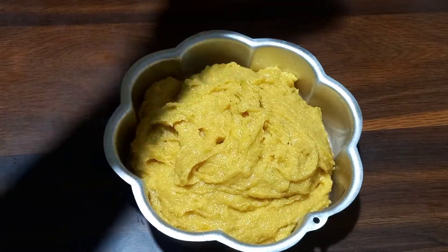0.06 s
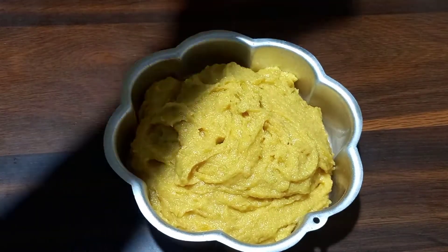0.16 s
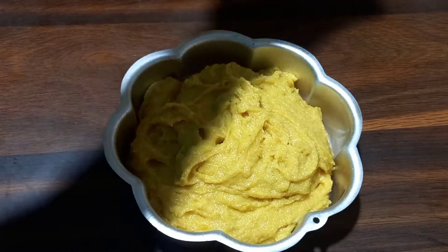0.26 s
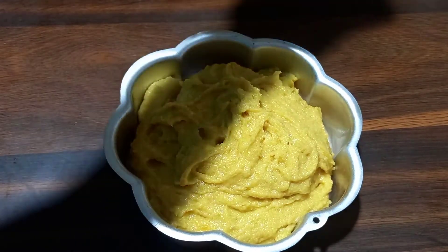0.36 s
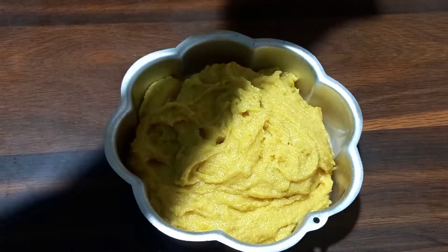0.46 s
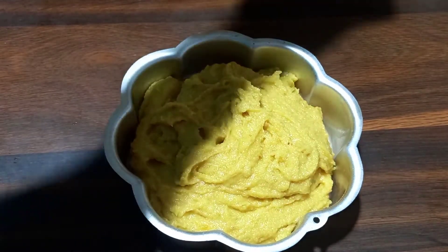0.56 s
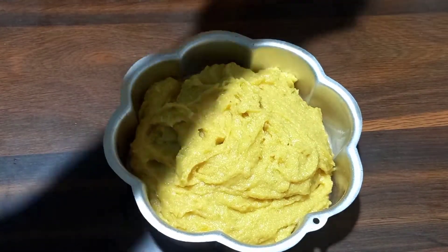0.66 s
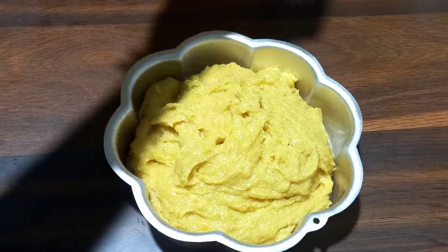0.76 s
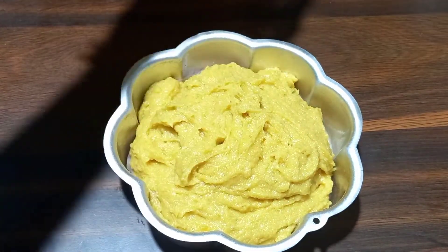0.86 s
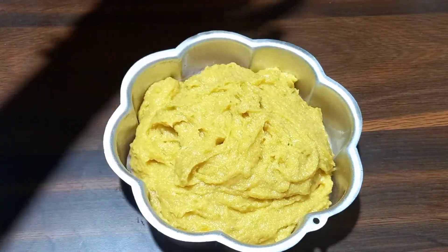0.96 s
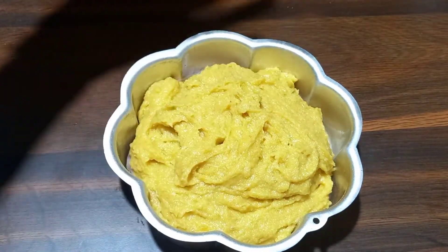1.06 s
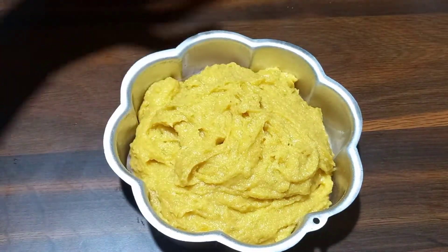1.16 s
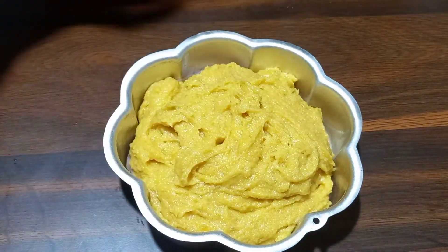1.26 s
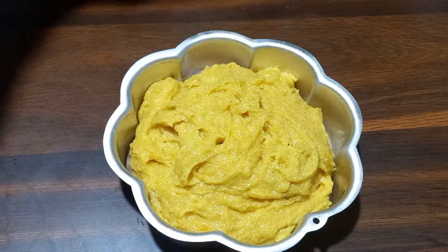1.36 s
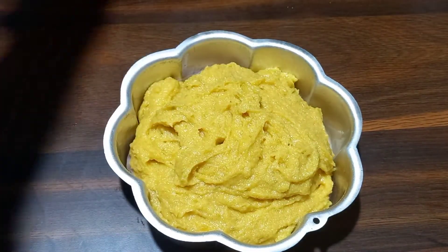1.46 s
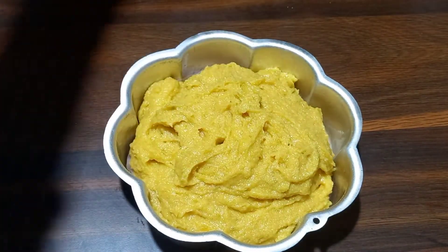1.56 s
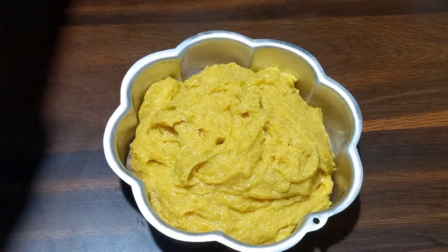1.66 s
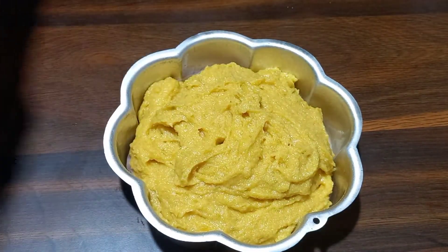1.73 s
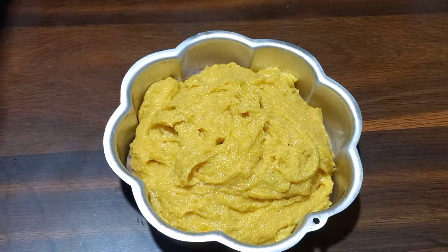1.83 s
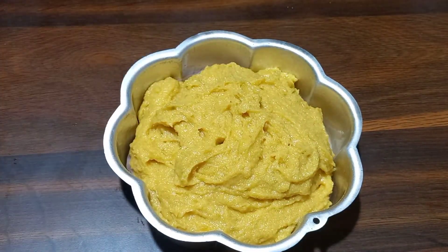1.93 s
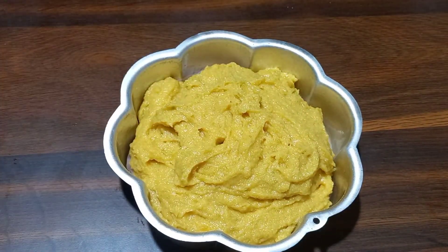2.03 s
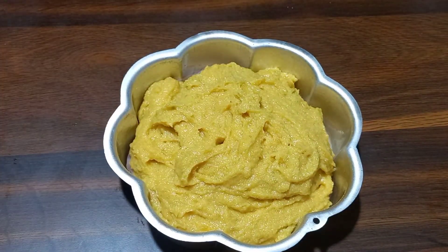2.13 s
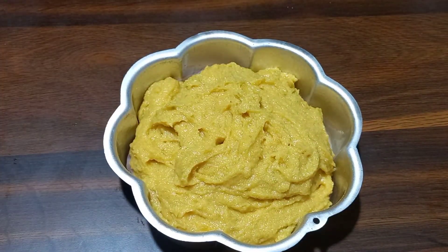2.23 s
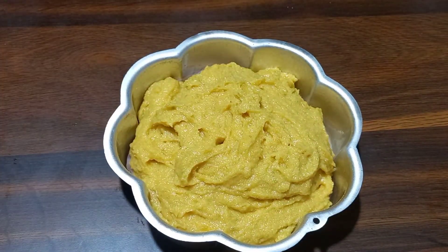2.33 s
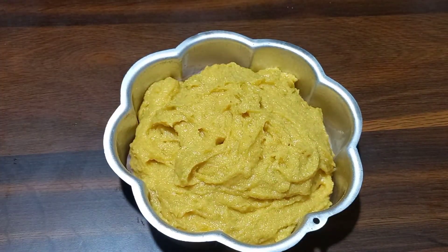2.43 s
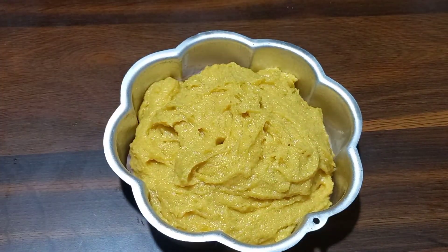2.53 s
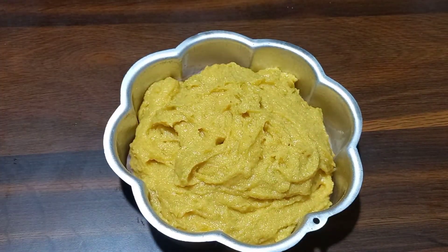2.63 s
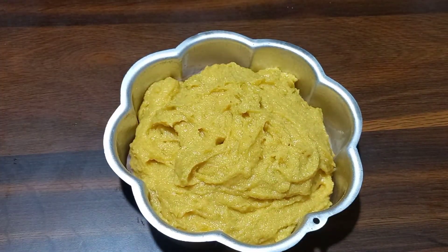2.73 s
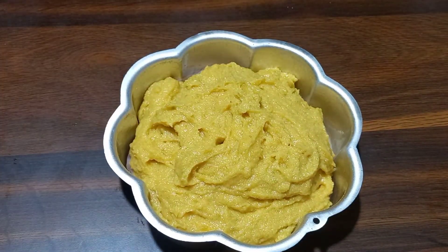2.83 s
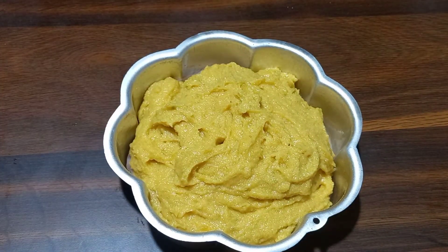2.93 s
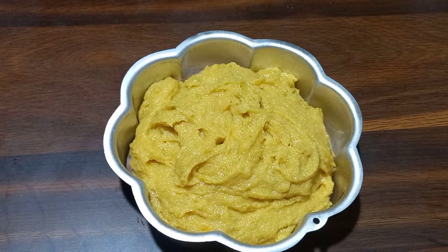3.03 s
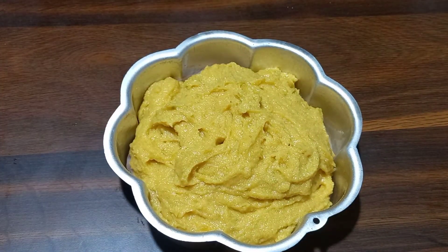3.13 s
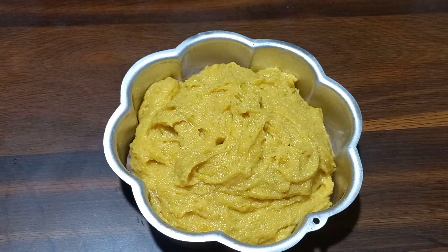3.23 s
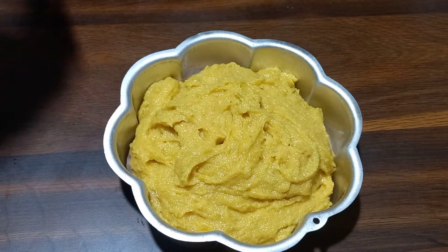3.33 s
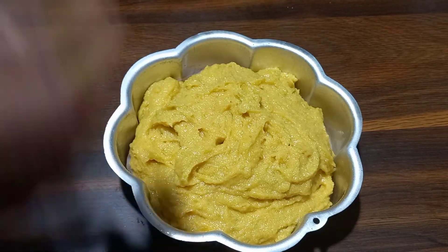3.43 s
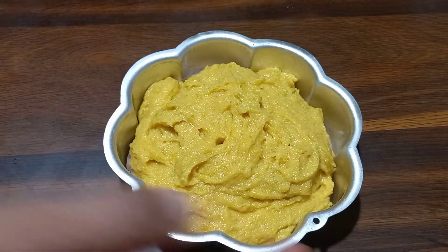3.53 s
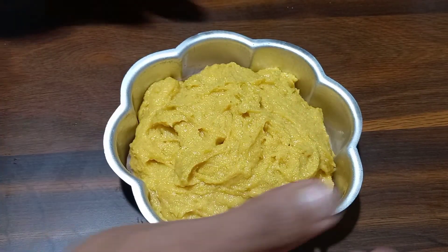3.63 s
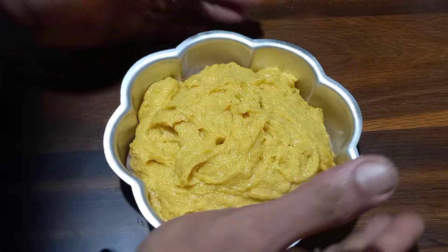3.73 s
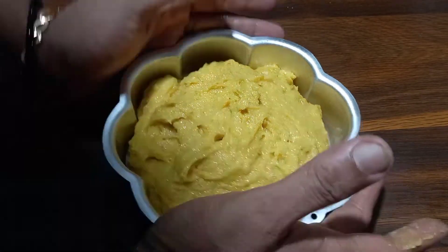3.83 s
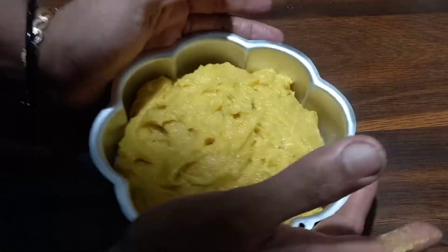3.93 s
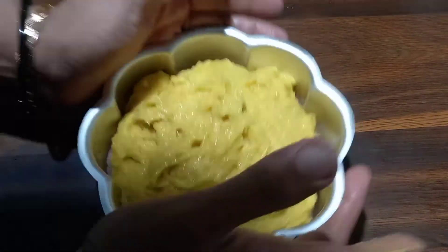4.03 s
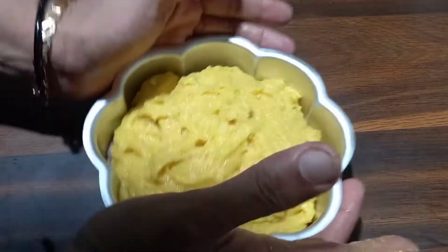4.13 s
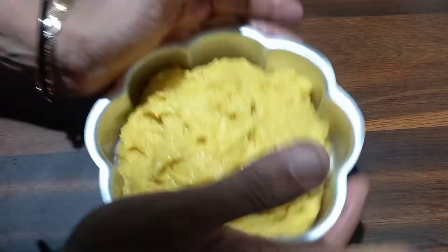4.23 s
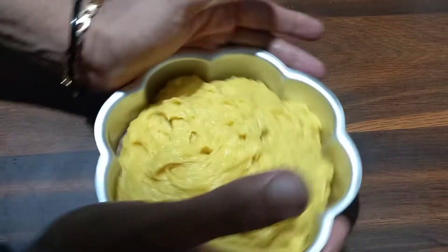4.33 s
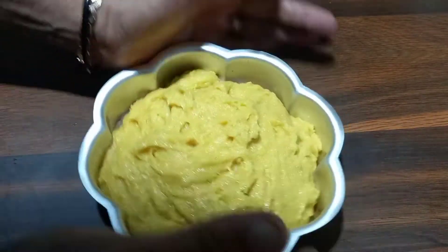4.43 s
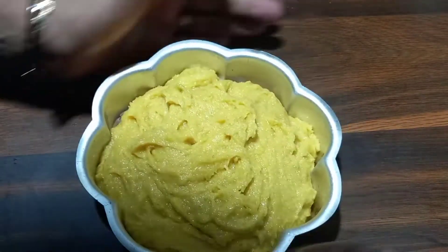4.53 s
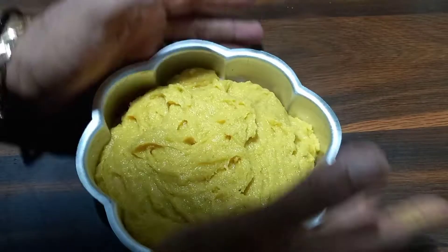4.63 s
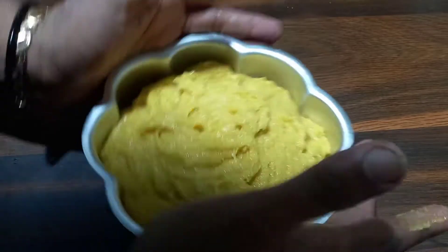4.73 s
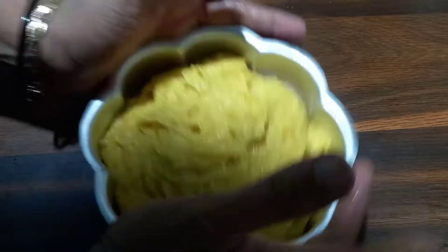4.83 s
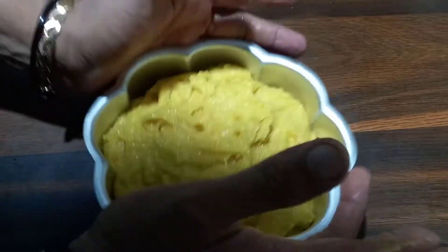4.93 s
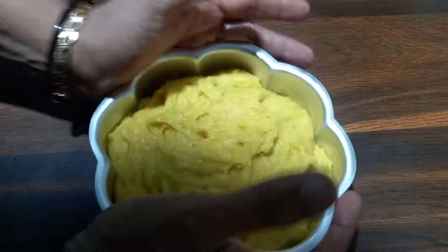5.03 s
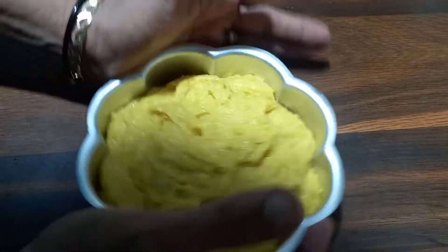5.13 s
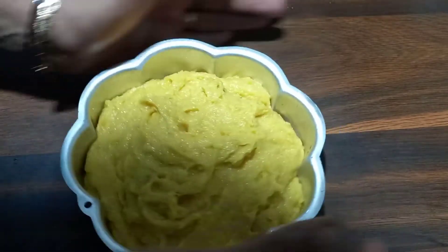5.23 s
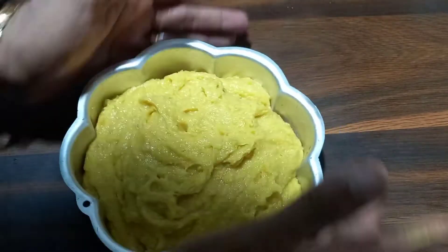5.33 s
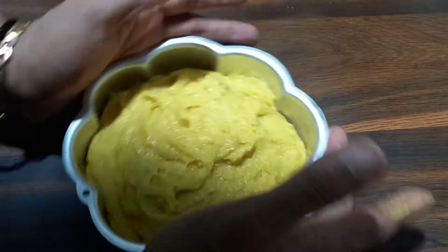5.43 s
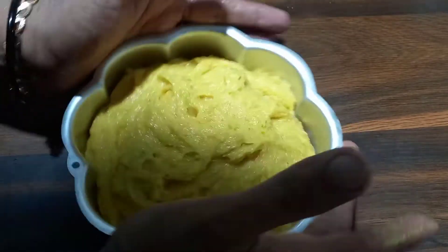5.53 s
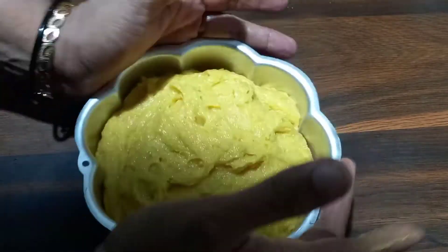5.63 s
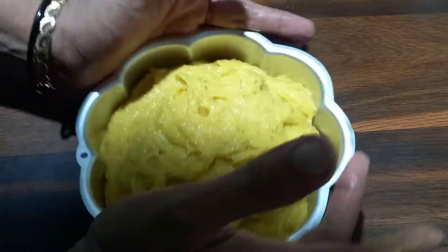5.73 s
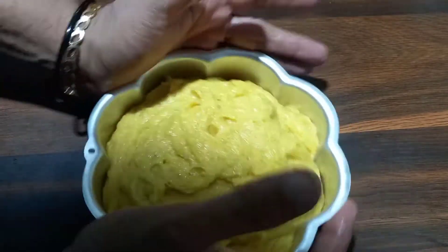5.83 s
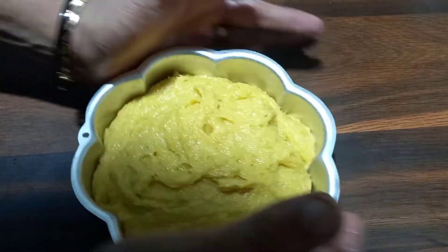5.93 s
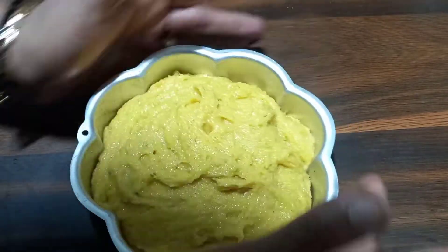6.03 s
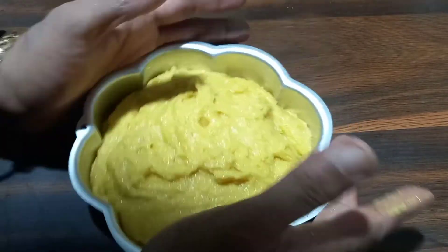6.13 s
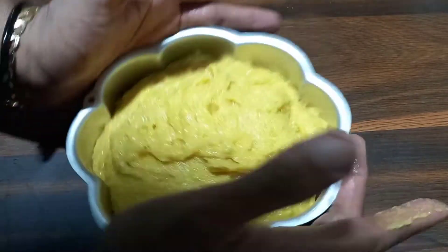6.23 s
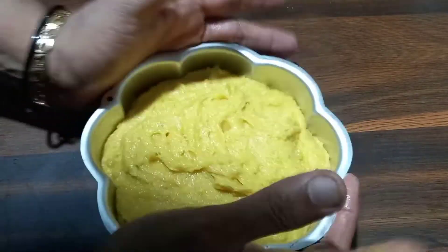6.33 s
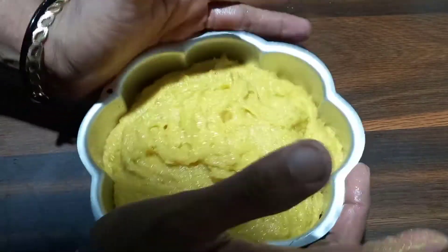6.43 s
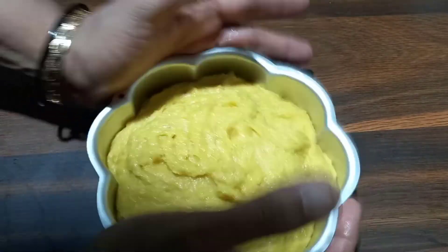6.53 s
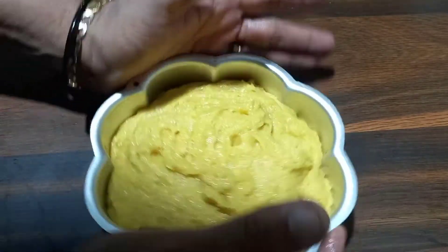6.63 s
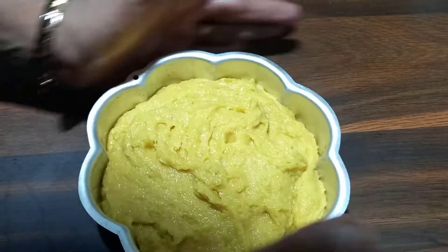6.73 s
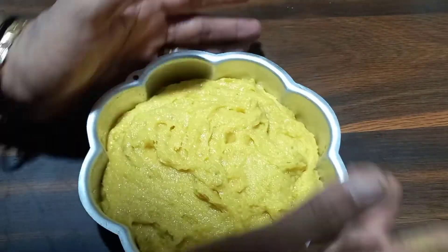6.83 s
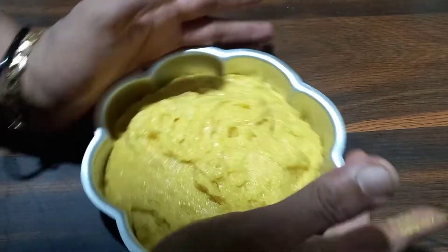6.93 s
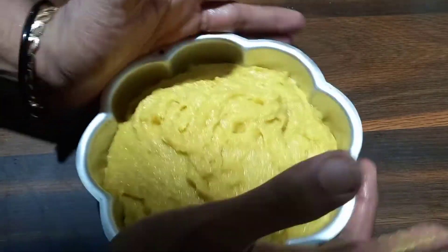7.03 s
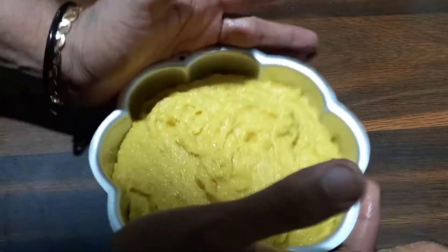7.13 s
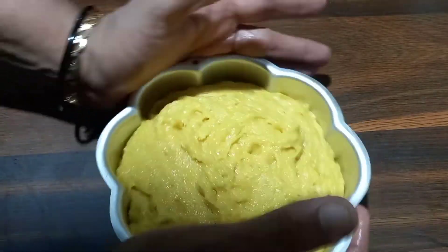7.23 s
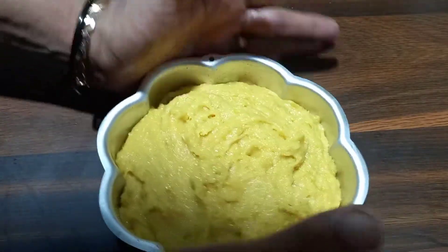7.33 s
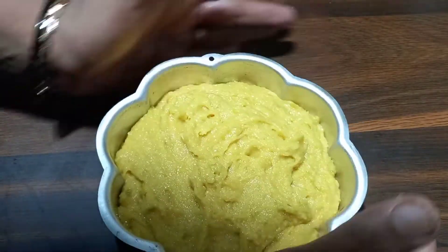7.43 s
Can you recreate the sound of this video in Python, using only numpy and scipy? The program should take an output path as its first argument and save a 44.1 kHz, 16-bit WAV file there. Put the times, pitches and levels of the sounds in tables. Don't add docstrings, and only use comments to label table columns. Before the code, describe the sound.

Soft wooden-sounding bowl knocks, rubbing and thin metallic scrapes open the scene, fading into a quiet room with light rustles. Thin bangles begin to tinkle as hands reach in. Five loud, flat double bangs of a batter-deadened metal tin on a counter follow at roughly regular intervals, bangles clinking after each impact and during lifting. Close stereo microphones catch a short, lively kitchen reverberation.

```python
import sys
import numpy as np
from scipy import signal
from scipy.fft import rfft, irfft, next_fast_len
from scipy.io import wavfile
from scipy.ndimage import uniform_filter1d

SR = 44100
rng = np.random.default_rng(int(sys.argv[2]) if len(sys.argv) > 2 else 0)


def elevation(decibels):
    levels = np.asarray(decibels, float)
    return 10 ** (levels / 20)


def log_audio(samples):
    frames = np.atleast_2d(samples).T
    limited = np.clip(frames, -1, 1)
    pcm = np.round(limited * 32767).astype(np.int16)
    wavfile.write(sys.argv[1], SR, pcm)


N = 329868

# (frequency [Hz], level [dB], T60 [s])
BOWL_MODES = [(79.5, -13.5, 0.27), (181, -12, 0.14), (218, -7.5, 0.11), (298.5, -8.5, 0.06),
              (365, -1, 0.11), (406.5, 1, 0.1), (473.2, -1.5, 0.12), (546, 0, 0.055), (613, -14, 0.0085)]
# (frequency [Hz], T60 [s])
KITCHEN_T60 = [(60, 0.29), (160, 0.48), (420, 0.55), (1100, 0.58), (2900, 0.56), (7700, 0.49),
               (16000, 0.32)]
# (frequency [Hz], level [dB per Hz])
SLAP_SPECTRUM = [(150, -30.5), (518, -10), (1010, -15), (1970, -9.5), (3100, -1), (6810, -7), (8450, -22.5),
                 (12300, -19.5), (16500, -26)]
TAIL_DB = -23
RISE_SHARE = 0.44


def rms_one(x):
    return x / np.sqrt(np.mean(x ** 2) + 1e-20)


def at_hz(points, hz):
    points = np.array(points)
    return np.interp(np.log(np.maximum(hz, 1)), np.log(points[:, 0]), points[:, 1])


def colour(x, spectrum):
    size = 4096
    cepstrum = irfft(np.log(elevation(at_hz(spectrum, np.fft.rfftfreq(size, 1 / SR)))))
    cepstrum[1:size // 2] *= 2
    cepstrum[size // 2 + 1:] = 0
    response = irfft(np.exp(rfft(cepstrum)))
    response = response.reshape((1,) * (x.ndim - 1) + (-1,))
    return signal.oaconvolve(x, response, axes=-1)[..., :x.shape[-1]]


def ring(clicks, hz, t60):
    radius = elevation(-60 / (max(t60, .003) * SR))
    angle = 2 * np.pi * hz / SR
    return signal.lfilter([0, np.sin(angle)], [1, -2 * radius * np.cos(angle), radius ** 2], clicks + 1e-18)


def strike(seconds, db, modes, spread_db):
    at = np.round(np.asarray(seconds) * SR).astype(int)
    out = np.zeros(N)
    chance = rng.standard_normal((len(at), len(modes), 2))
    for k, (hz, level_db, t60) in enumerate(modes):
        clicks = np.zeros(N)
        clicks[at] = elevation(db + level_db + spread_db * chance[:, k, 0]) * np.sign(chance[:, k, 1])
        out += ring(clicks, hz, t60)
    return out


def soften(x, hz):
    return signal.sosfilt(signal.butter(2, hz, fs=SR, output="sos"), x)


def unboom(x, hz):
    return signal.sosfilt(signal.butter(2, hz, "high", fs=SR, output="sos"), x)


def apart(x, lag):
    return np.stack([x, np.roll(x, lag)])


def chatter(seconds, db, length_s, per_s):
    starts = np.zeros(N)
    starts[np.round(seconds * SR).astype(int)] = elevation(db)
    dying = signal.lfilter([1], [1, -np.exp(-1 / (length_s * SR))], starts + 1e-18)
    shared, *own = rng.standard_normal((3, N)) * (rng.random((3, N)) < per_s / SR)
    return dying * (0.67 * shared + np.array(own))


def stereo_noise(size):
    # (frequency [Hz], left-right likeness [0-1])
    likeness = [(60, 0.5), (550, 0.4), (1650, 0), (4970, 0), (15000, 0.01)]
    mid, side = rfft(rng.standard_normal((2, size)))
    alike = np.clip(at_hz(likeness, np.fft.rfftfreq(size, 1 / SR)), 0, 1)
    return irfft(np.sqrt(1 + alike) * mid + np.sqrt(1 - alike) * side * np.array([[1], [-1]]), size)


def hush():
    # (frequency [Hz], level [dB per Hz])
    hush_spectrum = [(25, -23.5), (58, 3), (90, 5), (245, -14.5), (927, -20), (3600, -27), (3910, -28.5),
                     (4360, -13), (6300, -15), (7100, -6), (7920, -25), (15200, -30), (16500, -40.5)]
    return elevation(-70.5) * rms_one(colour(stereo_noise(N), hush_spectrum))


def kitchen(x, first_s=0.0015):
    t = np.arange(SR) / SR
    tail = 0
    noise = stereo_noise(SR)
    edges = 40 * 2 ** np.arange(0, 9, .75)
    for low, high in zip(edges, edges[1:]):
        band = signal.sosfilt(signal.butter(2, [low, high], "band", fs=SR, output="sos"), noise)
        tail = tail + band * elevation(-60 * t / at_hz(KITCHEN_T60, np.sqrt(low * high)))
    tail = tail * (1 - np.exp(-(t / first_s) ** 2))
    return signal.fftconvolve(x[None], tail / np.sqrt(np.sum(tail ** 2) / 2), axes=1)[:, :N]


def clatter(seconds, db, first_s=.005):
    # (frequency [Hz], level [dB per Hz])
    clatter_spectrum = [(71, -28), (120, -2), (223, -13.5), (508, -9), (750, -12), (1250, -6.5), (1950, -3),
                        (2900, -8.5), (4890, -13), (6900, -14.5), (7500, -26.5), (9660, -23.5),
                        (15200, -27.5), (16500, -62)]
    patchy_db, patch_s = 2.5, .03
    start = int(min(seconds) * SR)
    size = N - start
    energy, out = np.zeros(size), np.zeros((2, N))
    energy[np.round(seconds * SR).astype(int) - start] = elevation(2 * db)
    swell = np.exp(-1 / (first_s * SR))
    energy = signal.lfilter([1 - swell], [1, -swell], energy)
    noise = colour(stereo_noise(next_fast_len(size, True)), clatter_spectrum)[:, :size]
    noise = rms_one(noise)
    edges = 60 * 2 ** np.arange(0, 8.3, .55)
    for k, (low, high) in enumerate(zip(edges, edges[1:])):
        fade = elevation(-120 / SR / at_hz(KITCHEN_T60, np.sqrt(low * high)))
        band_filter = signal.butter(2, [low, high], "band", fs=SR, output="sos")
        band = signal.sosfilt(band_filter, np.roll(noise, shift=999 * k, axis=1))
        chance = rms_one(noise[0, 37 * k::int(patch_s * SR)])
        drift = np.interp(np.arange(size) / SR / patch_s, np.arange(len(chance)), chance)
        out[:, start:] += elevation(patchy_db * drift) * band * np.sqrt(signal.lfilter([1], [1, -fade], energy))
    return out


def strokes(rows):
    t = np.arange(0, N + 50, 50) / SR
    out = 0
    for s, db, other_db, hold_s, fade_s in rows:
        away = np.maximum((s - t) / RISE_SHARE, t - s - hold_s) / max(fade_s, .03)
        out = out + elevation(db - 60 * np.maximum(away, 0) + np.array([[0], [other_db]]))
    return [np.interp(np.arange(N) / SR, t, level) for level in out]


def dragging():
    # (time [s], rumble level [dB], drone against rumble [dB], hold
    # [s], fade T60 [s])
    slide_strokes = [(.086, -84, 11.5, .01, 0.36), (.36, -45, 10, 0.092, 0.3),
                     (.545, -67.5, 6.5, 0.11, 0.59), (.75, -38, 0.5, 0.075, 0.2),
                     (1.0, -76.5, -1.5, 0.55, 0.54), (1.53, -49.5, -9, 0.11, 0.19),
                     (1.768, -56.5, 1, .01, 0.21), (1.83, -75.5, 14.5, 0.29, 0.56),
                     (2.53, -74, -2, 0.095, 1.4), (3.138, -66.5, -3, 0.0092, 0.39),
                     (3.6, -82.5, 7.5, 0.27, 0.31), (4.7, -74.5, 2, 0.0088, 0.32),
                     (6.868, -93, 27, 0.023, 0.12)]
    # (time [s], rustle level [dB], scrape against rustle
    # [dB], hold [s], fade T60 [s])
    brush_strokes = [(.056, -80, 11, 0.061, 0.3), (.36, -56.5, 4, 0.0026, 0.57),
                     (.488, -58, 11.5, 0.0039, 0.28), (.55, -75, 9, 0.069, 0.21),
                     (.601, -56.5, 1.5, 0.0018, 0.15), (.69, -58, 5.5, 0.14, 0.22),
                     (.834, -62.5, 11, 0.0022, 0.16), (1.234, -58, -14.5, 0.0034, 0.37),
                     (1.576, -61.5, -10, 0.017, 0.56), (1.768, -59.5, -9, 0.0038, 0.1),
                     (1.87, -53.5, -5.5, 0.0061, 0.51), (2.2, -79.5, -10, 0.26, .5),
                     (2.476, -74, -11, 0.0044, .2), (2.6, -81, -12.5, .1, .6),
                     (3.138, -76.5, -4, 0.067, 0.16), (3.55, -76, -7.5, 0.34, 0.33),
                     (3.878, -84, 2, 0.0044, 0.29), (4.66, -55, -8, 0.0029, 0.15),
                     (4.708, -56, -2.5, 0.015, 0.14), (5.38, -70, -2.5, .005, 0.32),
                     (5.478, -61, -12.5, 0.013, 0.18), (6.868, -48, -6.5, 0.0032, 0.21),
                     (6.898, -76, 7, 0.0038, 0.13)]
    # (frequency [Hz], width [Hz], level [dB])
    scrape_bands = [(1166, 90, -5), (1530, 170, -3.5), (1900, 280, -1), (2780, 730, -8)]
    # (frequency [Hz], level [dB per Hz])
    rustle_spectrum = [(1470, -29), (2500, -10.5), (6810, -10.5), (7860, -24.5), (14300, -27), (16000, -28),
                       (16500, -55)]
    levels = strokes(slide_strokes) + strokes(brush_strokes)[::-1]
    rumble_level, drone_level, scrape_level, rustle_level = uniform_filter1d(levels, size=500)
    sizes = elevation(3.0 * np.minimum(rng.exponential(1, (2, N)), 3)) * rng.standard_normal((2, N))
    hail = sizes * (rng.random((2, N)) < 4000 / SR)
    rumble = sum(elevation(db) * ring(hail[0], hz, 0.82 * t60) for hz, db, t60 in BOWL_MODES[1:4])
    drone = sum(elevation(db) * ring(hail[0], hz, 0.82 * t60) for hz, db, t60 in BOWL_MODES[4:])
    scrape = 0
    for k, (hz, width_hz, db) in enumerate(scrape_bands):
        scrape = scrape + elevation(db) * rms_one(ring(hail, hz, 2.2 / width_hz)) * (-1) ** k
    scrape = rms_one(soften(scrape + scrape.mean(axis=0), 2900))
    rustle = rms_one(colour(.5 * hail + stereo_noise(N), rustle_spectrum))
    low = rumble_level * rms_one(soften(rumble, 490)) + drone_level * rms_one(soften(drone, 890))
    return apart(unboom(low, 160), lag=11) + scrape_level * scrape + rustle_level * elevation(0.5) * rustle


def singing():
    # (time [s], level [dB], frequency [Hz], hold [s], fade T60 [s])
    wall_tones = [(0.474, -52, 1102, 0.017, 0.13), (0.515, -59, 1817, 0.023, 0.13),
                  (0.563, -55, 1900, 0.026, 0.083), (.605, -55.5, 1850, .025, 0.11),
                  (0.577, -61, 2830, 0.009, 0.11), (0.675, -64, 1790, 0.079, 0.11),
                  (.81, -54, 1210, 0.013, 0.15), (.92, -80, 1216, 0.017, 0.13),
                  (1.194, -77, 1183, 0.06, 0.19), (1.235, -75.5, 1900, 0.031, .15),
                  (1.33, -89, 1170, 0.38, 0.17), (1.598, -73.5, 2124, 0.057, 0.22),
                  (1.757, -70, 1995, 0.015, 0.23), (2.272, -85, 1163, .04, 0.14),
                  (3.537, -78, 1540, 0.037, .1), (3.617, -73.5, 442, 0.12, 0.26),
                  (3.757, -67.5, 520, 0.097, .2), (3.826, -82.5, 1630, .08, 0.14),
                  (3.84, -81, 1355, .07, .12), (6.195, -62, 5050, 0.067, 0.4)]
    width_hz, lead_s = 22, .1
    out = np.zeros((2, N))
    t = np.arange(SR // 2) / SR
    since = t - lead_s
    noise = rng.standard_normal((len(wall_tones), 2, len(t)))
    for (s, db, hz, hold_s, fade_s), hiss in zip(wall_tones, noise):
        away = np.maximum(-since / RISE_SHARE, since - hold_s) / max(fade_s, .03)
        narrow = ring(hiss + hiss[0], hz, 2.2 / width_hz)
        tone = rms_one(ring(narrow, hz, .004))
        at = int((s - lead_s) * SR)
        out[:, at:at + len(t)] += tone * elevation(db - 60 * np.maximum(away, 0))
    return out


def bowl():
    # (time [s], peak level
    # [dB], grit against peak [dB])
    soft_touches = [(0.058, -59, 18), (0.284, -25, -47), (0.296, -23.5, -23), (0.305, -10.5, -13),
                    (0.314, -2, -17), (0.322, -2, -26.5), (0.337, -3, -29), (0.358, -27, -39),
                    (0.694, -15, -34.5), (0.699, -22, -37), (0.706, -18, -26), (0.716, -11, -11),
                    (0.722, -7, -27), (0.731, -23, -40), (0.745, -18, -21), (1.256, -52.5, -12.5),
                    (1.403, -50, -13.5), (1.756, -52, -1.5), (1.843, -72.5, 0), (3.59, -79, 21),
                    (3.63, -76, 27), (4.7, -62.5, 28), (5.42, -60.5, 23), (6.853, -54, 24.5)]
    # (frequency [Hz], level [dB per Hz])
    thud_spectrum = [(400, -25), (900, -1.5), (1900, 0), (3200, -18.5), (6500, -12.5), (8500, -23.5),
                     (16000, -25)]
    s, db, grit_db = np.transpose(soft_touches)
    body = soften(strike(s, db - 19.0, BOWL_MODES, spread_db=5.5), 800)
    thud = colour(chatter(s, db + grit_db - 0.5, length_s=0.013, per_s=11000), thud_spectrum)
    return apart(unboom(body, 64), lag=8.9) + thud


def bangles():
    # (frequency [Hz], level [dB], T60 [s], group [0 main, 1 top, 2 lowest])
    middle_modes = [(4900, -11, .13, 2), (5700, -12, .05, 2), (6350, -14, .03, 2), (9310, -1, .055, 0),
                    (9420, -3, .035, 0), (14900, -2, .05, 1), (15100, -4, .05, 1)]
    small_modes = [(5090, -15, .09, 2), (5300, -12, .035, 2), (9700, -3, .05, 0), (9800, -6, .03, 0),
                   (10450, -14, .02, 0), (15600, -2, .05, 1), (15480, -9, .025, 1), (14650, -11, .02, 1)]
    large_modes = [(4370, -6, .09, 2), (4520, -12, .05, 2), (13150, -9, .04, 0), (8340, -7, .05, 0),
                   (13400, 0, .07, 0), (13600, -4, .04, 0)]
    # (frequency [Hz], level [dB per Hz])
    tick_spectrum = [(2500, -48), (4600, 4.5), (7500, -2.5), (9700, -10), (12000, -4.5), (15000, 7.5),
                     (16500, -4.5)]
    # (time [s], ring level [dB], contact [0 middle, 1 small, 2 large, 3 middle; halves strike both],
    # tick level [dB], lift of the top modes [dB])
    reaching_clinks = [(0.4488, -61.5, .15, -52, -1.5), (0.5853, -38.5, 1.05, -22, -3),
                       (0.7164, -87, 2.8, -27, -2), (2.592, -63.5, 0.56, -37, 4),
                       (2.7876, -75, .3, -68, -0.5), (2.9224, -51.5, 0.96, -36, -3),
                       (2.944, -75, 0.65, -47, -4), (3.1046, -59, 2.5, -38, 13),
                       (3.135, -61, 2.46, -52.5, 5.5), (3.1908, -57.5, .85, -27.5, -5.5),
                       (3.391, -58.5, 0.2, -40.5, -0.5), (3.531, -51.5, 2.57, -40.5, 3.5),
                       (3.547, -55.5, 1.9, -47, 11.5), (3.5864, -41.5, 1.26, -27.5, 0.5),
                       (3.631, -44, 3.6, -15, 1.5), (3.6991, -59.5, 2.4, -52.5, 5),
                       (3.7523, -53.5, 2.33, -29.5, -1.5), (3.8136, -59, 1.9, -61.5, 2.5)]
    jolted_clinks = [
        (4.1771, -37.5, 0.73, -17.5, .3),
        (4.353, -39, 0.72, -12, .3),
        (4.9573, -44.5, 1.4, -16, .3),
        (5.1135, -41, 1.4, -21.5, 0.28),
        (5.7204, -54, 0.52, -38, .3),
        (5.888, -41, 1.3, -33, 0.27),
        (6.433, -44, 0.57, -24, 0.4),
        (6.601, -51.5, 0.5, -37, .3),
        (7.328, -57, 2.2, -19, .3),
    ]
    lifting_clinks = [(4.4753, -46, 0.64, -41, -5), (4.4907, -53, 0.28, -19.5, 3),
                      (4.553, -52, 0.21, -46, -2), (4.6144, -39, 0.93, -24, 6),
                      (4.666, -57, 3.4, -39.5, 1.3), (4.698, -39.5, 0.62, -20, 7.5),
                      (5.232, -44.5, 0.22, -20, 5.5), (5.306, -54.5, 1, -26, 12),
                      (5.4344, -66.5, 0.54, -58, 1.5), (5.456, -43, 1.1, -31, 3),
                      (5.5209, -43, 2.36, -38, 5.5), (6.046, -63, 0.51, -62.5, -0.5),
                      (6.067, -58, 0.56, -43, 4), (6.135, -67, .35, -36.5, 0), (6.19, -37, 0.83, -28, 4.5),
                      (6.208, -50, 0.83, -31.5, -8), (6.2168, -54, 0.38, -30, 5),
                      (6.254, -53, 0.35, -45, 12.5), (6.7125, -52, 3.45, -32, 4.5),
                      (6.8215, -51, 1.4, -32, 6.5), (6.855, -55, 0.58, -16.5, -8),
                      (6.8999, -44, 1.2, -39, 3), (6.912, -61, 1, -46, -4), (6.985, -52.5, 2.32, -53, 10),
                      (7.029, -64, 0.064, -87, 9), (7.437, -42, 0.63, -25, -2)]
    s, loudest_db, contact, tick_db, top_db = np.transpose(reaching_clinks + jolted_clinks + lifting_clinks)
    away = np.abs((contact - np.arange(3)[:, None] + 1.5) % 3 - 1.5)
    middle_db, small_db, large_db = loudest_db - 27.5 * (away - away.min(axis=0))
    tick = chatter(s, tick_db - 9.0, length_s=0.00083, per_s=7700)
    scuff = chatter(s, tick_db - 19.0, length_s=0.0052, per_s=15000)
    grit = colour(tick + scuff, tick_spectrum)
    low_db = -3 + 0.6 * top_db[:, None] + 2.5 * rng.standard_normal((len(s), 3))
    rings = 0
    pairs = ((middle_modes, middle_db), (small_modes, small_db), (large_modes, large_db - 5.0))
    for k, (modes, ring_db) in enumerate(pairs):
        touches = [chatter(s, ring_db - 4.0 + lift_db, length_s=0.012, per_s=1400)
                   for lift_db in (0, top_db, low_db[:, k])]
        rings = rings + sum(elevation(db) * ring(touches[group], hz, t60) for hz, db, t60, group in modes)
    return signal.sosfilt(signal.butter(4, 3900, "high", fs=SR, output="sos"), [rings, grit])


def lingering(seconds, db):
    # (frequency [Hz], level [dB], T60 [s])
    linger_modes = [(473.6, -4.5, 0.68), (501, -1.5, .7), (787, -9, 0.24), (877, -5, 0.49),
                    (1157, -8, 0.51), (1254, -7, 0.16), (1446, -4.5, 0.29), (1718, -11.5, 0.36),
                    (1980, -7, .6), (2000, -8.5, 1), (2450, -11, .5), (2640, -5.5, 0.34), (3470, -7.5, .35),
                    (3680, -7, .3)]
    modes = [(hz, level_db, min(t60, 900 / hz)) for hz, level_db, t60 in linger_modes]
    return apart(soften(strike(seconds, db - 14.5, modes, spread_db=1.5), 2400), lag=3.5)


def counter(seconds, db, boom_db):
    # (frequency [Hz], level [dB], T60 [s])
    boom_modes = [(83.7, -2.5, 0.52), (91.6, -0.5, 0.34), (64.4, -3.5, 0.28), (49, -4.5, 0.17)]
    # (frequency [Hz], level [dB], T60 [s])
    board_modes = [(210, -19, 0.17), (302, -9, 0.16), (331, -12, 0.068), (374, -5, 0.075),
                   (503.3, -1, 0.12), (565, -11.5, 0.11), (770, 5.5, 0.025)]
    boom, other = (soften(strike(seconds, db + boom_db - 4, boom_modes, spread_db=2.0), 120) for _ in range(2))
    board = strike(seconds, db - 14 - 15, board_modes, spread_db=1.5)
    wide_boom = apart(boom, lag=12) * elevation([[1.0], [-1.5]])
    own_boom = 0.18 * other * [[1], [-1]]
    return wide_boom + own_boom + apart(board, lag=6.2), board


def slaps(seconds, db, hz, room_db):
    burst_s = 0.0008
    t = np.arange(900) / SR
    out = np.zeros((2, N))
    crackle = rng.standard_normal((len(seconds), 3, len(t)))
    crackle = crackle[:, :1] + crackle[:, 1:]
    crackle *= (t / burst_s) ** .5 * np.exp(-t / burst_s)
    crackle[:, :, 0] = -2.6
    for k, burst in enumerate(colour(crackle, SLAP_SPECTRUM)):
        tone = ring(burst, hz[k], 0.0053)
        edge_db = -1.5 + 3.5 * np.log2(hz[k] / 1600)
        slap = tone / np.abs(tone).max() + elevation(edge_db) * burst / np.abs(burst).max()
        at = round(seconds[k] * SR)
        out[:, at:at + len(t)] += elevation(db[k]) * slap / np.abs(slap.mean(axis=0)).max()
    settling = chatter(seconds + 0.00047, db + room_db + 2.0, length_s=0.0078, per_s=3800)
    puff = chatter(N / SR - seconds, db - 11, length_s=0.0014, per_s=22000)[:, ::-1]
    return out + colour(settling + puff, SLAP_SPECTRUM)


def cake_tin():
    # (time [s], peak level [dB], slap pitch [Hz], weight on the counter [dB], room share [dB])
    first_landings = [(4.077, -9.5, 1436, -52, 0), (4.0873, -6, 2230, -19, 5),
                      (4.8723, -9, 1980, -24.5, 7.5), (4.8835, -11.5, 2000, -15.5, -14),
                      (4.896, -15.5, 1525, -14.5, -3), (5.6246, -8.5, 1730, -25, 4),
                      (5.628, -7, 2000, -34, -3), (6.331, -9.5, 1320, -38.5, 0.5),
                      (6.3454, -4, 2140, -23.5, 0.5), (7.0654, -19, 1900, -44, 1),
                      (7.0663, -8.5, 1910, -37, 0.5), (7.0802, -3, 2000, -58, -16),
                      (7.083, -1, 1690, -27, -9)]
    bounce_landings = [(4.2808, -11, 1200, -19, 0), (4.2849, -1.5, 2090, -37.5, -4),
                       (4.303, -11.5, 1420, -26.5, -9.5), (5.0276, -3.5, 1360, -20, -7.5),
                       (5.0499, -4.5, 2230, -21, 1), (5.0661, -21.5, 1990, -49.5, -18),
                       (5.7978, -11, 1440, -26.5, -1), (5.808, -14.5, 1490, -39.5, -7.5),
                       (5.8118, -2, 1870, -33, -7.5), (5.8165, -15, 1690, -37.5, -4.5),
                       (6.5056, -9, 1400, -36, 3), (6.52, -6.5, 1500, -27, 0.5),
                       (6.5251, -10.5, 2000, -22, -20), (6.5335, -15, 1765, -36, -6),
                       (7.2124, -11, 1260, -19.5, -2), (7.23, -22, 1790, -35, 10),
                       (7.2388, -8.5, 1400, -52, -17), (7.2432, -6, 2000, -26, 1.5)]
    # (frequency [Hz], level [dB], T60 [s])
    tin_modes = [(1133, -5, 0.0084), (1210, -4, 0.073), (1460, -9.5, 0.14), (1643, 6, 0.028),
                 (2000, -3.5, 0.13), (2157, 2, 0.086), (2300, -1, 0.023), (4000, -8.5, 0.013)]
    s, db, hz, boom_db, room_db = np.transpose(first_landings + bounce_landings)
    tin = strike(s, db - 27, tin_modes, spread_db=3.5)
    worktop, board = counter(s, db, boom_db)
    tail_db = db + room_db + TAIL_DB
    return slaps(s, db, hz, room_db) + tin + lingering(s, tail_db) + worktop + clatter(s, tail_db), board


def scene():
    tin, board = cake_tin()
    rings, grit = bangles()
    near, rub = bowl(), dragging()
    direct = tin + (rings + grit) * elevation([[-.8], [.8]]) + near + elevation(-2.0) * rub + singing()
    clinks_sent = elevation(-16.5) * rings[0] + elevation(-6.5) * grit[0]
    sent = elevation(-1.5) * board + clinks_sent + elevation(-13.5) * near[0] + elevation(-20.5) * rub[0]
    return direct + kitchen(sent) + hush()


def band_limit(x):
    return signal.sosfilt(signal.butter(12, 17000, fs=SR, output="sos"), x)


def record(dry):
    low = signal.sosfiltfilt(signal.butter(2, 2200, fs=SR, output="sos"), dry[1])
    bright = dry[1] - low + 0.69 * unboom(dry[1], 8100)
    lagged = np.stack([dry[0], np.roll(bright, shift=1) + np.roll(low, shift=4)])
    rounded = 1.05 * np.tanh(1.35 * unboom(lagged, 42))
    cut = signal.sosfilt(signal.cheby2(12, 60, 16450, fs=SR, output="sos"), rounded)
    return band_limit(cut)


dry = scene()
out = record(dry)
log_audio(out)
```